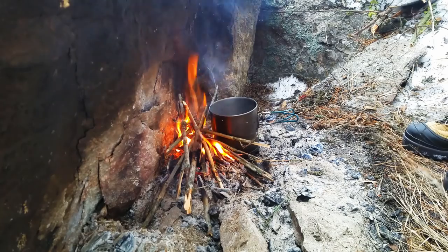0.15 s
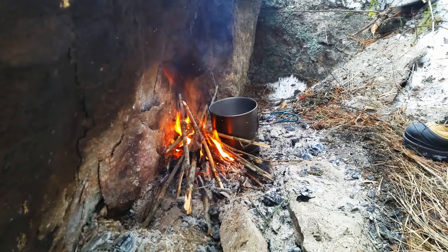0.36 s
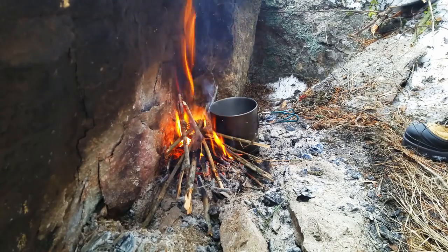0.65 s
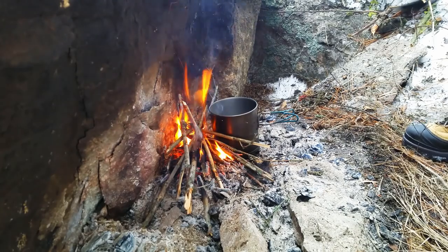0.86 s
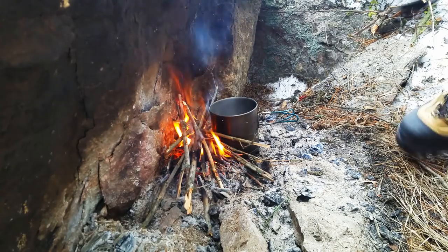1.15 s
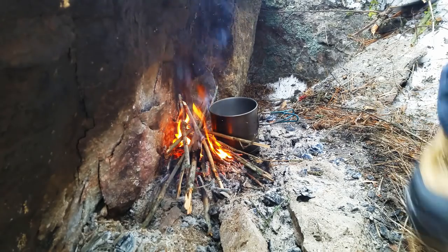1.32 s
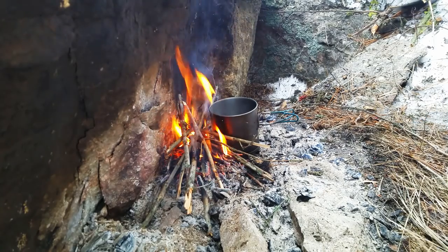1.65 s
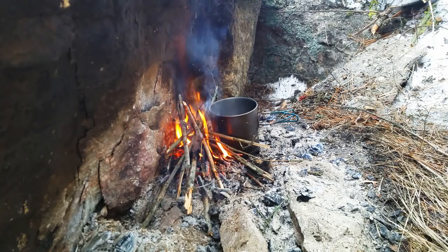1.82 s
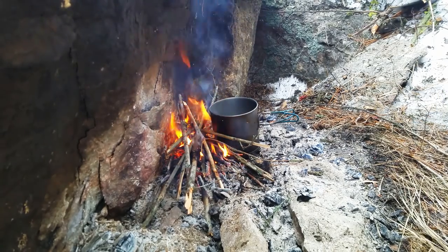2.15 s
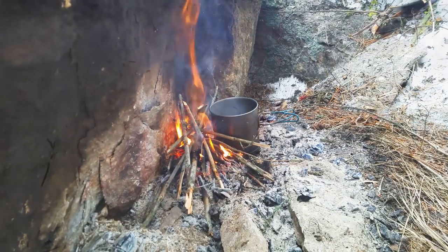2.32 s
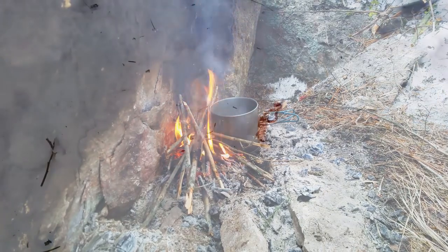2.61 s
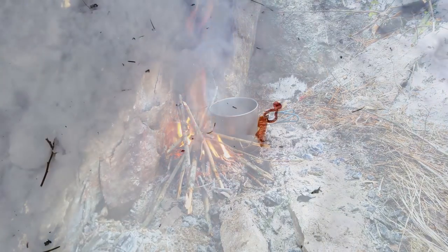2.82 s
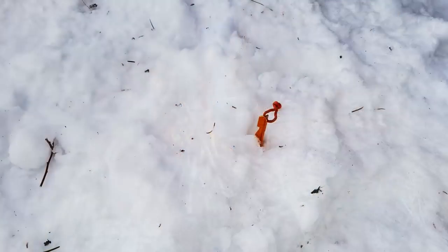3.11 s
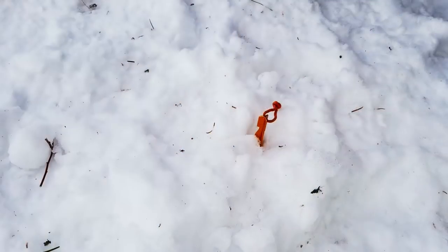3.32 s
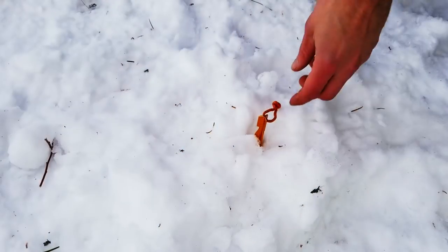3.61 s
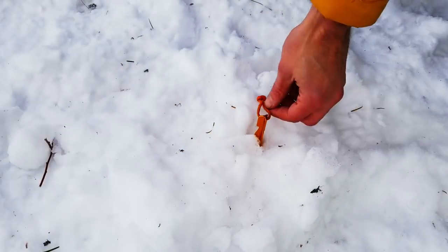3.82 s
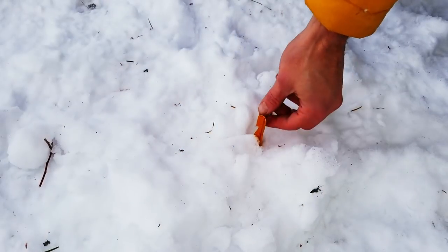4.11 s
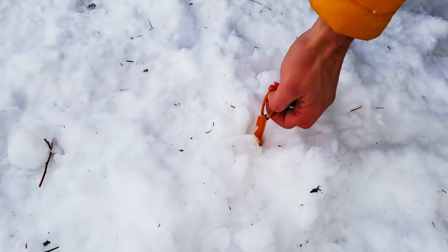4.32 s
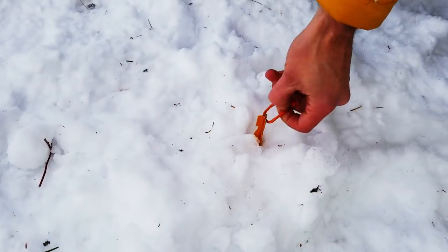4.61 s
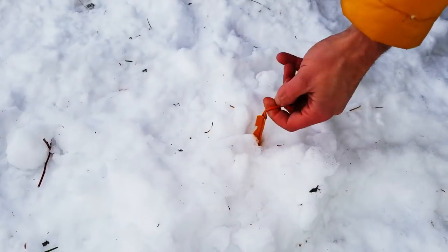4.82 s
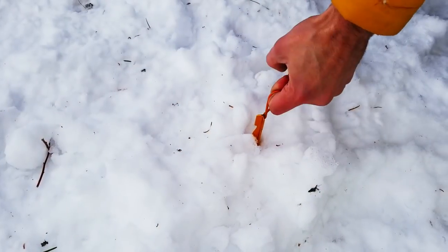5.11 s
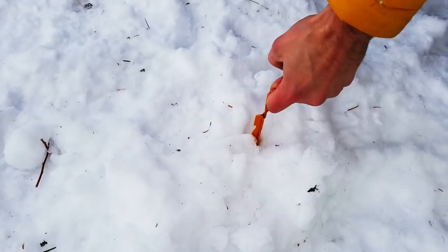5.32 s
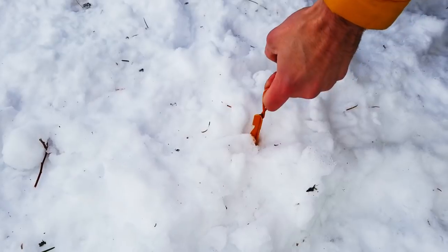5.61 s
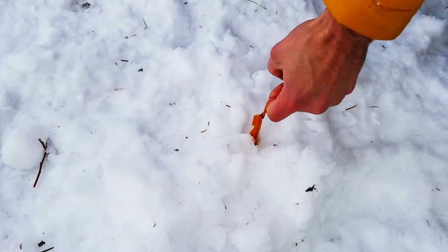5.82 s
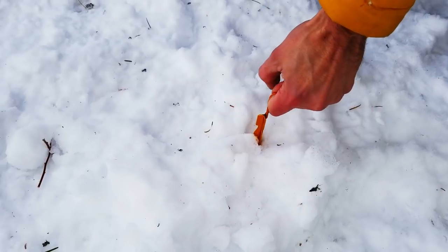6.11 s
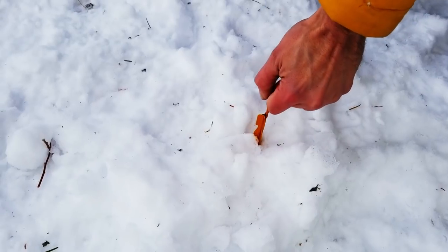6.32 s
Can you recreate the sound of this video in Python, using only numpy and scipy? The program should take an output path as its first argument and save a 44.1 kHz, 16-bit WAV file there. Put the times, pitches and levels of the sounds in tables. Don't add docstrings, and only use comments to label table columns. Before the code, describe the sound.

First, a little campfire flutters, hisses and snaps, with hard bright twig bursts and small spits, while a boot scrapes twice over dry needles. Then the scene changes to snow: cloth brushes past, a hand gropes, icy crust snaps in small bright clicks, and a firmer press gives a dull thud. After that there is almost nothing but faint air, soft low wind bumps and a gentle cord tug with muffled knocks. Close, dry stereo pickup outdoors.

```python
import sys
import numpy as np
from scipy import signal
from scipy.fft import rfft, irfft, next_fast_len
from scipy.io import wavfile
from scipy.ndimage import uniform_filter1d

SR = 44100
rng = np.random.default_rng(int(sys.argv[2]) if len(sys.argv) > 2 else 0)


def store_wav(level_fs):
    pcm = np.round(np.clip(np.atleast_2d(level_fs), -1, 1) * 32767)
    wavfile.write(sys.argv[1], SR, pcm.T.astype(np.int16))


def level_to_linear(level):
    exponent = np.asarray(level, float) / 20
    return 10 ** exponent


N = 284600

# t/s, level/dB of four layers, low to high
AIR = [(0, -74.5, -78, -82, -87), (6.453, -74.5, -85, -83, -85.5)]
# f/Hz, level/dB
AIR_COLOUR = [(40, -0.5), (180, -16), (260, -35), (15500, -38.5)]
# t/s, length/s, f/Hz, level/dB, left minus right/dB
WIND_BUMPS = [
    (4.414, 0.028, 90, -58, -9),
    (4.455, 0.054, 61, -56, -10),
    (4.522, 0.091, 49, -58.5, -3),
    (4.851, 0.058, 61.5, -57.5, 14),
    (5.01, .05, 55, -60, 15),
    (5.05, 0.05, 66, -52.5, 15),
    (5.3, 0.042, 79, -63, 5),
    (5.334, 0.061, 45, -57, 5.5),
    (5.45, 0.07, 51, -57.5, 16),
    (5.738, 0.056, 50, -61, 5),
]
# t/s, left minus right/dB
SIDE_DRIFT = [(0.0, 2), (0.21, -1.5), (0.86, 2), (1.0, -1.5), (1.63, -3), (2.77, -2.5), (3.25, 1.5),
              (5.75, -2), (6.45, -1)]
# f/Hz, time to fall 60 dB/s, level/dB
PORT_RINGS = [(5670, 0.0032, -5), (6850, 0.0021, -0.5), (2300, 0.0018, -13), (8920, 0.0014, -3),
              (11200, 0.0013, 3), (14000, 0.0016, -4.5)]
FIRE_EDGES = (20, 250, 1200, 7300, 15850)
SNOW_EDGES = (20, 200, 3000, 7300, 15850)
# t/s, level/dB, f/Hz, ring/s, left minus right/dB
THUMPS = [(0.86, -35, 90.5, 0.02, 1), (1.634, -38.5, 76, 0.18, 0), (1.811, -41, 156, 0.34, 3),
          (1.865, -28.5, 73.7, 0.11, 3), (1.937, -36.5, 78, 0.068, 1.5), (2.516, -40, 118, 0.16, -1.5),
          (2.652, -34.5, 65.5, 0.026, 1.5), (4.002, -37.5, 83, 0.14, 6), (5.847, -52, 96, 0.085, 5.5),
          (5.879, -43.5, 103, 0.1, 5.5), (5.938, -34.5, 97.5, 0.14, 4), (5.965, -36, 106, 0.092, 2.5),
          (6.056, -41.5, 123.4, 0.1, 7), (6.072, -45.5, 87.7, 0.12, 6.5)]
# t/s, length/s,
# centre f/Hz, width/Hz, level/dB
NOISE_BURSTS = [ (0.394, 0.0072, 1000, 1200, -57), (0.532, 0.0053, 1000, 900, -48),
                (1.058, 0.0053, 1820, 1880, -44), (0.758, 0.096, 318, 209, -46.5),
                (4.934, 0.0074, 1380, 1800, -57), (0.773, 0.095, 4070, 910, -54.5),
                (1.294, 0.14, 740, 161, -51.5), (1.696, 0.26, 1840, 1240, -55.5), (2.63, 0.048, 625, 353, -48),
                (2.644, 0.053, 238, 120, -44.5), (3.839, 0.052, 5040, 3010, -50), (3.854, 0.07, 380, 301, -57.5),
                (3.956, 0.014, 12400, 5000, -47), (2.649, 0.032, 5450, 3000, -51),
                (5.756, 0.13, 3600, 1800, -71.5), (4.133, 0.084, 9010, 9010, -56),
                (4.206, 0.015, 9020, 9020, -54), (4.27, 0.055, 4700, 2510, -52), (5.876, 0.024, 298, 205, -56.5),
                (5.878, 0.018, 11000, 9000, -61), (5.918, 0.053, 9800, 14000, -53.5),
                (5.928, 0.041, 350, 351, -54.5), (5.929, 0.067, 3020, 1940, -58.5),
                (5.961, 0.027, 8700, 13000, -54.5), (5.962, 0.0206, 564, 401, -52.5),
                (6.049, 0.044, 198, 160, -47.5), (6.054, 0.028, 8550, 15100, -50.5),
                (6.061, 0.017, 740, 301, -55.5), (0.5906, 0.0028, 5340, 2500, -28),
                (0.7585, 0.0031, 4850, 1700, -21), (0.7582, 0.0048, 790, 900, -35.5),
                (4.002, .024, 210, 131, -40.5), (6.057, 0.019, 3260, 2600, -54.5)]

# t/s, cloth speed/dB
SWEEP = [
    (3.234, -0.5),
    (3.247, 1.5),
    (3.331, -4.5),
    (3.391, -7),
    (3.421, -6),
    (3.64, -15.5),
]
# t/s, cloth speed/dB
REACH = [
    (3.64, 1),
    (3.73, -4),
    (3.79, -1.5),
    (3.895, -1),
    (3.905, -11.5),
    (4.17, -5.5),
    (4.232, -1.5),
    (4.34, -7.5),
    (4.39, -18),
]
# t/s, cloth speed/dB
STILL = [(4.39, 0.5), (4.502, -9.5), (4.656, -4), (4.925, -9), (4.94, 10.5), (5.109, -12.5), (5.213, -2.5),
         (5.463, -7.5), (5.561, -1), (5.593, -11), (5.653, -1.5), (5.85, 4.5), (5.91, -7), (6.145, 7.5),
         (6.175, -21), (6.3, -20.5), (6.37, -3), (6.453, -1)]
# t/s, force/dB
TUG = [
    (5.86, -15),
    (5.994, 1),
    (6.118, -11),
]
# level/dB, dB per dB of speed or force
SWEEP_LAW = [(-50, 1.8), (-47, 0.36), (-38, 1), (-35, 1.28)]
REACH_LAW = [(-61, 0.092), (-55.5, 0.7), (-50, 0.97), (-48, 1)]
STILL_LAW = [(-68.5, 0.053), (-76, 0.32), (-69.5, 0.9), (-64.5, 0.74)]
TUG_LAW = [(-57, 0.88), (-67.5, 0.84), (-83, .6), (-80, .6)]
# f/Hz, level/dB
SLEEVE_COLOUR = [(15, -50), (25, -6.5), (69, -6.5), (221, -7), (260, -11.5), (469, -4), (970, -9),
                 (1710, -9), (2850, -11), (4870, 1.5), (6550, -6), (12200, -3.5), (15500, -5)]
RUB_COLOUR = [(15, -26), (25, 1), (804, -1.5), (2170, -8.5), (4040, 4.5), (6550, -0.5), (7700, -5.5),
              (9550, -11), (13200, -4.5), (15500, -11)]
STILL_COLOUR = [(25, -2), (55, -6.5), (86, -9.5), (183, -10), (240, -32), (648, -37.5), (804, -29.5),
                (945, -40.5), (5100, -40), (5500, -32.5), (15500, -34)]
# t/s, peak level/dB, f/Hz, left minus right/dB
CRUMBS = [(3.243, -27, 12900, -2), (3.578, -42, 4160, -2), (3.5934, -37.5, 5500, -1.5),
          (3.6584, -40, 11000, 0), (3.6724, -38, 13600, 1.5), (3.6863, -41, 4450, -.5),
          (3.6935, -36, 5000, -2), (3.7427, -34, 5200, 1), (3.7474, -37, 4470, -4.5),
          (3.7684, -40, 4550, 0.5), (3.7893, -36.5, 6000, 0), (3.863, -34, 6110, -3),
          (3.8795, -34, 6000, 2), (3.8874, -40, 3880, 0), (3.917, -43, 7000, -1), (3.991, -46, 5500, -1),
          (4.0078, -35, 6550, -4.5), (4.0584, -40, 7830, 2), (4.1125, -43, 2400, -7),
          (4.1574, -37, 5470, -.5), (4.1684, -33, 5670, 1), (4.1914, -38, 7000, .5), (4.2362, -46, 3460, 2),
          (4.2764, -40, 5540, 0), (4.2904, -39, 5320, .5), (4.3146, -39, 4560, .5), (4.3344, -48, 3830, 0),
          (4.3695, -44, 4720, -2), (4.9544, -52, 3990, -3), (5.881, -47, 13500, -5.5),
          (5.8944, -43, 13300, -5), (5.9263, -41, 13400, -9), (5.9394, -43, 6200, -6),
          (5.9628, -38, 6300, -6), (6.0578, -46, 13100, -5), (6.1444, -54.5, 12300, -3)]
# t/s, peak level/dB, f/Hz, left minus right/dB
SNAPS = [(3.2654, -36, 5140, -3), (3.3019, -28, 4740, -9), (3.4403, -30, 5800, 2.5), (3.466, -30, 5000, 2),
         (3.6449, -28, 5460, 0), (3.696, -32, 5370, 3.5), (3.7533, -30, 5170, 6), (3.8699, -31.5, 5200, -9),
         (3.929, -30.5, 5800, -1), (4.0718, -40, 7900, 11), (4.148, -28.5, 4840, -5),
         (4.2195, -23, 5850, 8.5), (4.2233, -27.5, 6000, -15), (4.2499, -24, 5260, 5),
         (4.2609, -26.5, 3930, 0), (4.2931, -28, 5430, 4), (4.9347, -36, 6000, 0)]
# t/s, peak level/dB, f/Hz, left minus right/dB
PRESSES = [
    (3.9999, -24, 5000, -4),
    (4.0339, -35, 1130, -2),
    (4.3224, -30, 4770, 6.5),
    (4.3514, -51, 4050, 6),
    (4.3822, -48, 4740, -2.5),
    (4.7307, -54.5, 1930, 1),
    (6.0651, -38.5, 12800, -19),
]

# t/s, pressure/dB
DRAGS = [
    [(1.165, -14), (1.19, -7), (1.215, -5.5), (1.3, -2.5), (1.35, -4.5), (1.41, 0.1), (1.544, -2.5),
     (1.63, -15.5)],
    [(2.17, -2.5), (2.188, -8), (2.356, 0.8), (2.404, -4), (2.414, -9)],
]
# level/dB, dB per dB of pressure
DRAG_LAW = [(-62.5, -0.8), (-45, 1.5), (-39, 1), (-46.5, 1.7)]
SHUFFLE_LAW = [(-54.5, .1), (-55, .3), (-37.5, 0.87), (-49.5, 1)]
# f/Hz, level/dB
DRAG_COLOUR = [(15, -47.5), (25, -22), (86, -6), (389, -12), (509, -20.5), (722, -6.5), (1530, -15.5),
               (2920, -13), (4870, -15.5), (5730, -10.5), (8350, -18.5), (15500, -19.5)]
SHUFFLE_COLOUR = [(15, -27), (25, -20.5), (86, -26), (1140, -17), (1570, -9.5), (2420, -8.5), (3440, -12),
                  (5880, -8), (8130, -20), (11800, -19), (15500, -27)]

# t/s, flame size/dB, sap hiss/dB
FIRE = [(0.0, -2, 3), (0.128, 0.5, -1.5), (0.284, -0.5, -1.5), (0.704, 0.5, -4), (0.9, -3.5, -2),
        (1.16, 0.5, -5), (1.63, 5, -1), (1.858, -2.5, -3), (2.056, 2.5, 4), (2.17, 1, 7), (2.41, 2, -2.5),
        (2.572, -0.5, 3.5), (2.712, 2, 3.5), (2.874, 3.5, 4), (2.895, 0.5, -1.5), (3.054, 5.5, -4.5),
        (3.154, 4, 4.5), (3.231, -7, 4.5)]
# level/dB, dB per dB of flame, dB per dB of sap
FIRE_LAW = [(-54, 1, 0), (-56.5, 0.34, 0.5), (-56, 0, 1), (-67.5, 0, 0.8)]
# f/Hz, level/dB
FIRE_COLOUR = [(15, -51), (25, -20), (75, -7.5), (198, -13), (433, -17), (552, -25), (666, -18.5),
               (1200, -28), (5430, -27), (8350, -36.5), (12200, -34), (15500, -38)]
# t/s, peak level/dB, f/Hz, left minus right/dB
SPARKS = [(0.0241, -47, 3600, -1), (0.4683, -44, 3080, -1), (0.924, -53, 12000, 0), (0.9944, -48, 3200, 1),
          (1.3114, -33, 5600, -1), (1.4604, -35, 14000, 0), (1.6492, -51, 5000, -1), (1.966, -50, 3500, 0),
          (1.995, -52, 4500, 0), (2.4292, -34, 2350, 0), (2.5064, -43, 4950, -8), (2.558, -42, 4000, 1),
          (2.6648, -42, 5600, -5), (2.878, -42, 6500, 1), (2.9652, -47.5, 9000, 0), (3.067, -49, 5500, -1)]
# t/s, peak level/dB, f/Hz
TICKS = [
    (1.668, -44.5, 7000),
    (1.6846, -41, 4770),
    (1.9096, -43, 5800),
    (1.4458, -34, 14000),
    (2.2338, -32, 2430),
    (2.4683, -36, 1770),
    (2.4972, -31.5, 6860),
    (2.5521, -41, 3460),
]
# t/s, peak level/dB, f/Hz, thud/dB, left minus right/dB
SPITS = [
    (0.2294, -27, 3400, -38, -4.5),
    (0.3361, -44.5, 3130, 6, 5),
    (0.5487, -29.5, 4060, -16, -4.5),
    (2.0138, -35, 3200, -2.5, -3),
    (2.4204, -21, 5950, -10.5, 0),
    (3.2147, -30.5, 1590, -26, 0.5),
]
# t/s, peak level/dB, f/Hz, thud/dB, left minus right/dB
POPS = [(0.4449, -42, 2800, 5, 1), (0.5896, -11.5, 5400, -13, 1.5), (0.7572, -15, 5110, -21.5, 8.5),
        (0.8904, -30, 5330, -3.5, 2), (1.1328, -15.5, 6100, -14.5, 2), (1.4451, -20.5, 1900, -29, 5.5),
        (1.8108, -35.5, 1010, 2, -6), (1.8442, -16.5, 4130, -20, 2.5), (2.1705, -23.5, 3340, -8, 2),
        (2.3316, -28, 3250, -36, 4), (2.3466, -22.5, 3000, -21, -4), (2.7731, -23, 5600, -4, -3),
        (3.0719, -47, 1010, 7.5, -4), (3.0964, -30, 3900, -10.5, -1.5), (3.1863, -47, 2570, 8, -7),
        (3.2031, -23.5, 3600, -7, -1)]
POP_ECHO = [-12, -15.5, -18.5, -8, -13.5, -10, -12, -13, -14, -7, -19, -14, -12, -11, -14, -10]


def walk(rate, size):
    hold = int(SR / rate)
    levels = rng.standard_normal(N // 100)[:size // hold + 1]
    smooth = uniform_filter1d(uniform_filter1d(np.repeat(levels, hold), hold), hold)
    return 1.3 * smooth[:size]


def grains(per_s, spread_db, smooth_db):
    size_db = spread_db * np.minimum(rng.exponential(size=N), 3.5)
    hits = (rng.random(N) < per_s / SR) * level_to_linear(size_db)
    tail_s = 0.0015
    hits = signal.lfilter([1], [1, -np.exp(-1 / (tail_s * SR))], hits)
    return hits / np.sqrt(np.mean(hits ** 2)) + level_to_linear(smooth_db)


def layers(curve, law):
    curve, law = np.array(curve), np.array(law)
    return np.column_stack([curve[:, 0], law[:, 0] + curve[:, 1:] @ law[:, 1:].T])


def texture(table, colour, edges_hz, grain, alike, lag, flicker_db, bass_flicker_db):
    s, *columns = np.transpose(table)
    fade_s = 0.004
    first = max(int((s[0] - fade_s) * SR), 0)
    last = min(int((s[-1] + fade_s) * SR), N)
    t = np.arange(first, last) / SR
    size = next_fast_len(len(t))
    hz = np.maximum(np.fft.rfftfreq(size, 1 / SR), 1)
    colour_hz, colour_db = np.transpose(colour)
    shape = level_to_linear(np.interp(np.log(hz), np.log(colour_hz), colour_db))
    noise = rng.standard_normal((3, len(t)))
    piece = grain[first:last]
    grainy = rfft(noise * piece, size) / np.sqrt(np.mean(piece ** 2))
    common, left, right = np.where(hz < 400, rfft(noise, size), grainy) * shape

    share = np.clip(alike[1] + (alike[0] - alike[1]) / (1 + (hz / alike[2]) ** 2), 0, 1)
    late = np.exp(-2j * np.pi * hz * lag / SR)
    shared = np.sqrt(share) * common * np.array([late, late ** 0])
    pair = shared + np.sqrt(1 - share) * np.array([left, right])
    pan_db = np.interp(t, *np.transpose(SIDE_DRIFT))
    out = np.zeros((2, N))
    for low, high, db in zip(edges_hz, edges_hz[1:], columns):
        layer = 0
        steps = np.geomspace(low, high, 5)
        bass = low == edges_hz[0]
        for a, b in zip(steps, steps[1:]):
            flicker = level_to_linear((bass_flicker_db if bass else flicker_db) * walk(16, len(t)))
            band = irfft(pair * ((hz >= a) & (hz < b)), size)[:, :len(t)]
            layer = layer + band * flicker
        side_db = np.array([[1], [-1]]) * (1.6 if bass else pan_db) / 2
        level = level_to_linear(np.interp(t, s, db) + side_db)
        out[:, first:last] += layer / np.sqrt(np.mean(layer ** 2)) * level
    nearest_end = np.minimum(t - s[0], s[-1] - t)
    out[:, first:last] *= np.sqrt(np.clip(nearest_end / fade_s / 2 + 0.5, 0, 1))
    return out


def ring(t, hz, t60):
    return np.sin(2 * np.pi * hz * t) * np.exp(-np.log(1000) * t / t60)


def add(out, when, sounds, pan_db):
    for s, sound, pan in zip(when, sounds, pan_db):
        i = int(s * SR)
        n = min(sound.shape[1], N - i)
        out[:, i:i + n] += sound[:, :n] * level_to_linear(np.array([[pan], [-pan]]) / 2)


def breaks(table, echo_db, thud_db=None, pan_db=None):
    s, peak_db, hz, *rest = np.transpose(table)
    thud = rest[0] if thud_db is None else thud_db + 0 * s
    pan = rest[-1] if pan_db is None else pan_db + 0 * s
    echo = echo_db + 3 * rng.standard_normal(len(s))
    return np.column_stack([s, peak_db, hz, thud, pan, echo])


def cracks(out, table, burst_s, own_db, tick_db, echo_t60, thud_hz, late_s, thin, steep):
    s, peak_db, hz, thud_db, pan_db, echo_db = (c[:, None, None] for c in np.transpose(table))
    t = np.arange(2048) / SR
    chance = rng.standard_normal((len(table), 5, len(t)))
    burst = 0.32 * (chance[:, :1] + 3.3 * chance[:, 1:3])
    burst = burst * np.sqrt(t / burst_s) * np.exp(-(t / burst_s) ** 2)
    burst[:, :, :2] += 0.6

    echo_ends_s = 0.02
    fade = np.exp(-np.log(1000) * t / echo_t60 - (t / echo_ends_s) ** 4) * np.minimum(t / 0.002, 1)
    echo = level_to_linear(np.minimum(echo_db, 0) - 2.5) * chance[:, 3:] * fade
    echo = signal.lfilter([0.7], [1, -0.25], echo)

    detune = 1 + 0.025 * np.clip(chance[:, 3:, :1], -1.5, 1.5)
    body = sum(level_to_linear(db) * ring(t, f * detune, t60) for f, t60, db in PORT_RINGS)
    body = body + level_to_linear(own_db) * np.minimum(hz / 5000, 1) * ring(t, hz * detune ** 0.3, 0.0039)
    body[:, :, 0] += level_to_linear(tick_db)

    lag = np.clip(0.86 * chance[:, :1, -1:], -2, 2) * np.array([[1], [-1]]) / 2 + 5
    late = np.exp(-2j * np.pi * np.fft.rfftfreq(4096) * lag)
    pitch = 1j * np.fft.rfftfreq(4096, 1 / SR) / np.minimum(hz, 6000)
    tilt = (pitch / (pitch + thin)) ** steep / (1 + pitch * 700 / hz) ** 2
    sound = irfft(rfft(burst + echo, 4096) * rfft(body, 4096) * late * tilt)[:, :, :len(t)]
    sound /= np.abs(sound).max(axis=(1, 2), keepdims=True)
    thud = ring(t, 3.2 * thud_hz, 0.0024) + 0.26 * ring(t, thud_hz * detune[:, :1], 0.016)
    sound += level_to_linear(thud_db + 5.5) * thud
    add(out, s.ravel() + late_s, sound * level_to_linear(peak_db + 3), pan_db.ravel())


def open_air():
    return texture(AIR, AIR_COLOUR, SNOW_EDGES, np.ones(N), (0.6, 0.05, 300), 0, 0.6, 2.2)


def wind_bumps(out):
    for s, length, hz, db, pan_db in WIND_BUMPS:
        t = np.arange(int(length * SR)) / SR
        slide, start = rng.standard_normal(2)
        turns = hz * t * (1 + 0.11 * slide * (t / length - 1))
        sound = np.sin(2 * np.pi * turns + start) * np.hanning(len(t))
        add(out, [s], [sound * level_to_linear(db) * np.ones((2, 1))], [pan_db])


def thumps(out):
    s, peak_db, hz, t60, pan_db = (c[:, None, None] for c in np.transpose(THUMPS))
    t = np.arange(8192) / SR
    rough = rng.standard_normal((len(THUMPS), 1, len(t)))
    rough = uniform_filter1d(uniform_filter1d(rough, size=48, axis=2), size=32, axis=2)
    sound = ring(t, hz, t60) + 0.5 * ring(t, 2.414 * hz, t60 * 0.61)
    sound = (sound + 2.0 * rough * np.exp(-6.0 * t / t60)) * np.minimum(t / 0.0052, 1)
    sound = sound / np.abs(sound).max(axis=2, keepdims=True) * np.ones((1, 2, 1))
    add(out, s.ravel(), sound * level_to_linear(peak_db), pan_db.ravel())


def noise_bursts(out):
    for s, length, hz, width, db in NOISE_BURSTS:
        noise = rng.standard_normal((2, 16384))
        noise[1] = noise[1] + max(1 - hz / 1500, 0) * (noise[0] - noise[1])
        f = np.fft.rfftfreq(16384, 1 / SR) + 1
        resonance = 1 / (1 + ((f * f - hz * hz) / (f * width)) ** 2)
        sound = irfft(rfft(noise) * resonance)[:, :int(length * SR)]
        fade = signal.windows.tukey(sound.shape[1], 0.5)
        add(out, [s], [sound / sound.std() * level_to_linear(db) * fade], [0])


def sleeve_and_cord(out):
    cloth, smooth = grains(900, 2.4, 5.9), np.ones(N)
    for curve, law, colour, grain in [(SWEEP, SWEEP_LAW, SLEEVE_COLOUR, cloth),
                                      (REACH, REACH_LAW, RUB_COLOUR, cloth),
                                      (STILL, STILL_LAW, STILL_COLOUR, smooth),
                                      (TUG, TUG_LAW, STILL_COLOUR, smooth)]:
        out += texture(layers(curve, law), colour, SNOW_EDGES, grain, (0.7, 0.2, 900), -2.5, 1.32, 0.88)


def snow_crust(out):
    crumbs = breaks(CRUMBS, echo_db=-7, thud_db=-29)
    cracks(out, crumbs, burst_s=0.00067, own_db=9.4, tick_db=-1, echo_t60=0.012,
           thud_hz=320, late_s=0.00062, thin=0.36, steep=1.9)
    crust = np.vstack([breaks(SNAPS, echo_db=-9.5, thud_db=-18.5),
                       breaks(PRESSES, echo_db=-9.5, thud_db=-11.5)])
    cracks(out, crust, burst_s=0.00081, own_db=3.7, tick_db=0.12, echo_t60=0.028,
           thud_hz=288, late_s=0.0004, thin=0.59, steep=1.37)


def boot_drags(out):
    needles = grains(1700, 2.8, 5.1)
    for curve, law, colour in zip(DRAGS, (DRAG_LAW, SHUFFLE_LAW), (DRAG_COLOUR, SHUFFLE_COLOUR)):
        out += texture(layers(curve, law), colour, FIRE_EDGES, needles, (0.95, 0.35, 450), 16.3, 1.63, 1.4)


def flames(out):
    crackle = grains(400, 3.4, 4.9)
    out += texture(layers(FIRE, FIRE_LAW), FIRE_COLOUR, FIRE_EDGES, crackle,
                   (0.95, 0.35, 450), -5.0, 1.5, 1.3)


def twig_pops(out):
    sparks = breaks(SPARKS, echo_db=-8, thud_db=-27.5)
    cracks(out, sparks, burst_s=0.00066, own_db=8.6, tick_db=-4.5, echo_t60=0.02,
           thud_hz=240, late_s=0.0005, thin=0.29, steep=1.21)
    twigs = np.vstack([breaks(POPS, np.array(POP_ECHO)),
                       breaks(SPITS, echo_db=0.5),
                       breaks(TICKS, echo_db=-5.5, thud_db=-39, pan_db=-4)])
    cracks(out, twigs, burst_s=0.00047, own_db=0.71, tick_db=-2.5, echo_t60=0.027,
           thud_hz=232, late_s=0.0008, thin=0.047, steep=1.1)


def scene():
    out = open_air()
    wind_bumps(out)
    thumps(out)
    noise_bursts(out)
    sleeve_and_cord(out)
    snow_crust(out)
    boot_drags(out)
    flames(out)
    twig_pops(out)
    return out


def top_cut(x):
    return signal.sosfilt(signal.butter(12, 16820, fs=SR, output="sos"), x)


def record(dry):
    no_rumble = signal.butter(2, 42, "high", fs=SR, output="sos")
    no_top = signal.ellip(8, 0.2, 70, 16000, fs=SR, output="sos")
    mix = signal.sosfilt(np.vstack([no_rumble, no_top]), dry)
    return top_cut(mix)


dry = scene()
out = record(dry)
store_wav(out)
```